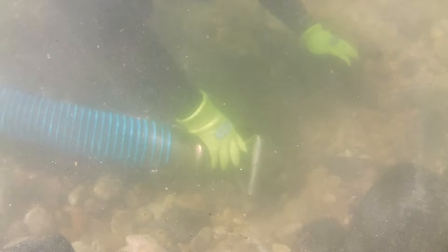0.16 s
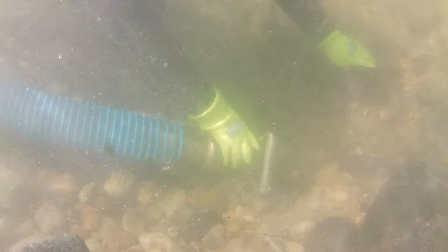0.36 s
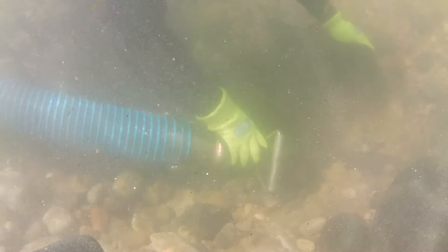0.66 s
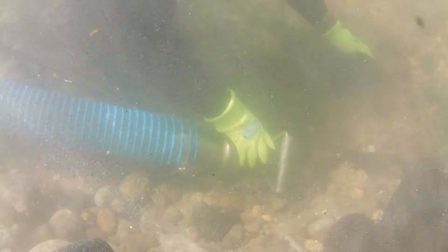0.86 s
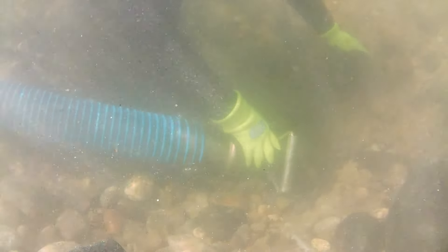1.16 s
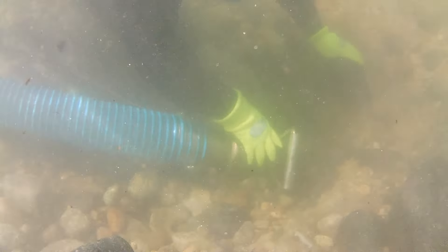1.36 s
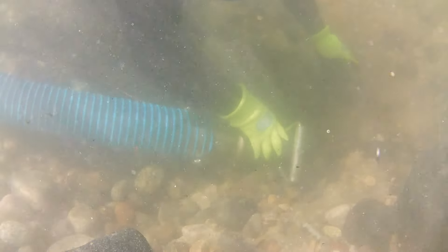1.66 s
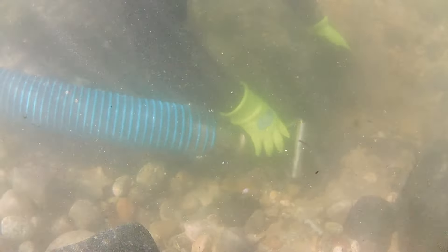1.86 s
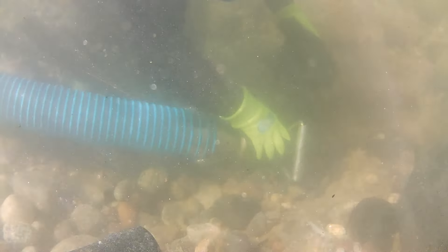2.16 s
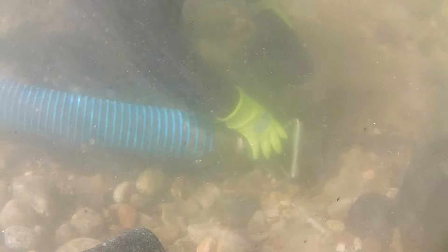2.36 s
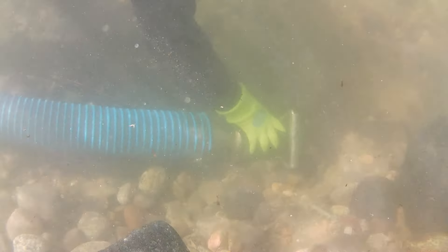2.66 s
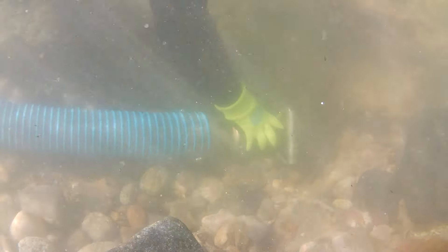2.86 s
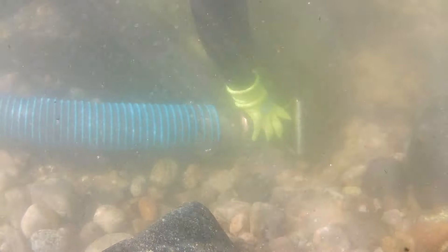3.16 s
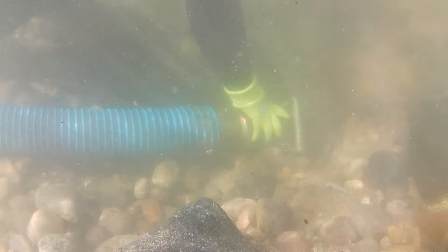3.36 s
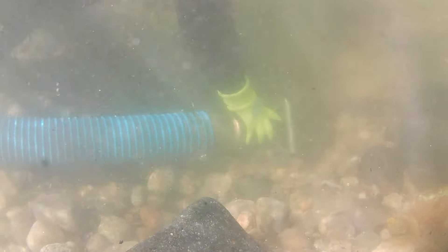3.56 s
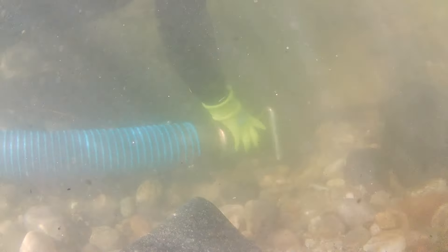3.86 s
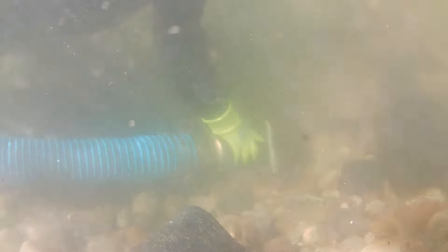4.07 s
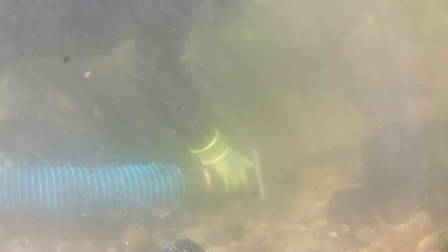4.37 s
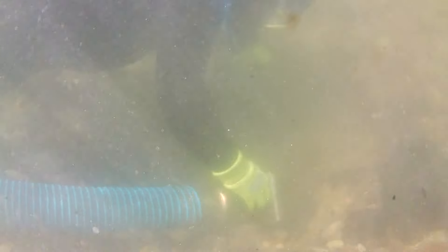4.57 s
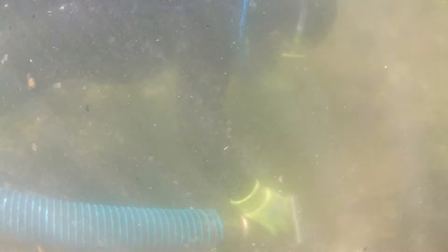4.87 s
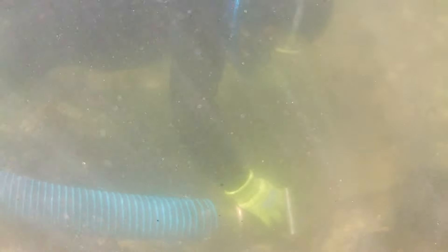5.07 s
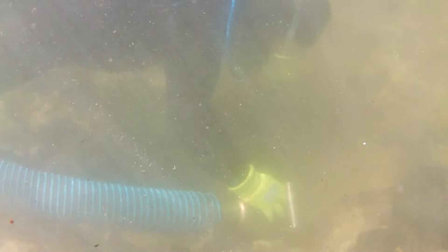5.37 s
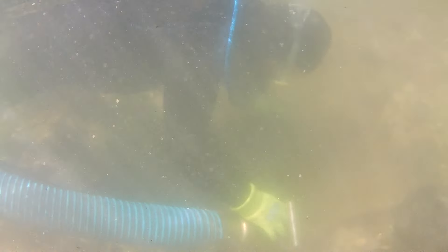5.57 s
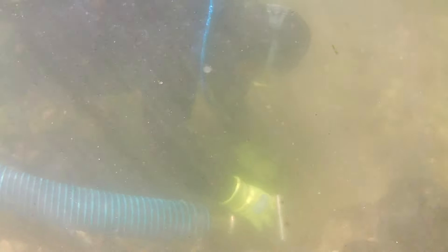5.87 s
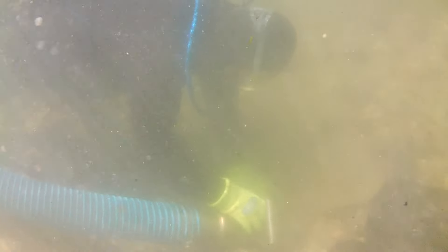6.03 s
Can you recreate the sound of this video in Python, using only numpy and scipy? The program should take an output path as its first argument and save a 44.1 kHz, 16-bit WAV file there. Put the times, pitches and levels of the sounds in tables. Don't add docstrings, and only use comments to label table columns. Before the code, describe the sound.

A quiet bed of murmuring water, faint motor hum and fine sandy hiss is broken by dry, short stone clacks, rattles and pebble ticks. The busiest, loudest cluster comes in the first second; knocks then scatter, with another hard metallic blow midway. Muffled low bumps follow as current rocks the enclosed underwater microphone, and a last sharp knock comes near the end.

```python
import sys
import numpy as np
from scipy import signal
from scipy.fft import rfft, irfft
from scipy.io import wavfile
from scipy.ndimage import uniform_filter1d

SR = 44100
rng = np.random.default_rng(int(sys.argv[2]) if len(sys.argv) > 2 else 0)


def level_to_linear(level):
    exponent = np.asarray(level, float) / 20
    return 10 ** exponent


def store_pcm(level_fs):
    pcm = np.round(np.clip(level_fs, -1, 1) * 32767).astype(np.int16)
    wavfile.write(sys.argv[1], SR, np.atleast_2d(pcm).T)


N = 273420
T = np.arange(N) / SR
CUT_HZ = 7650

PART_HZ = [900, 1700, 3500, 5600]
# time in seconds, low rush in dB, high grit in dB.
SAND = [(0.0, -50.5, -70), (0.15, -54.5, -77), (0.53, -53, -49.5), (1.14, -58.5, -82), (1.6, -55, -54),
        (2.0, -56.5, -76.5), (2.85, -56.5, -55), (3.25, -55, -72), (3.65, -56, -86.5), (4.3, -52, -79),
        (5.0, -55, -78), (5.4, -54, -87), (5.75, -53.5, -53), (6.2, -56, -69)]


def unit(x):
    return x / np.sqrt(np.mean(x ** 2))


def ring(x, hz, t60_s):
    r = np.exp(-np.log(1000) / (t60_s * SR))
    w = 2 * np.pi * hz / SR
    return signal.lfilter([0, r * np.sin(w)], [1, -2 * r * np.cos(w), r * r], x)


def walk(rate_hz):
    hold = int(SR / rate_hz)
    steps = np.repeat(rng.standard_normal(N // hold + 1), hold)
    return 1.3 * uniform_filter1d(uniform_filter1d(steps, hold), hold)[:N]


def curves(table):
    s, *columns = np.transpose(table)
    return [np.interp(T, s, c) for c in columns]


def lay(times_s, shapes):
    at = (np.asarray(times_s) * SR).astype(int)[:, None] + np.arange(shapes.shape[1])
    return np.bincount(np.clip(at, 0, N).ravel(), shapes.ravel(), N + 1)[:N]


def water():
    # frequency in Hz, density in dB per Hz.
    colour = np.array([(15, -31.5), (25, 9.5), (48, -2.5), (138, 2), (230, -11.5), (267, -7.5), (350, -8),
                       (479, -2), (583, -6), (775, -26.5), (900, -15.5), (1170, -75), (1980, -120)])
    # time in seconds, surge in dB, water in dB.
    swell = [
        (0.0, -57, -60),
        (3.85, -52.5, -59.5),
        (4.21, -47, -59),
        (6.2, -54, -61.5),
    ]
    surge_db, rest_db = curves(swell)
    low_db = surge_db - np.mean(surge_db) + np.mean(rest_db) + 8.1
    f = np.fft.rfftfreq(N, 1 / SR) + 1
    tilt_db = np.interp(np.log(f), np.log(colour[:, 0]), colour[:, 1])
    noise = rfft(rng.standard_normal(N)) * level_to_linear(tilt_db)
    noise = noise / np.std(irfft(noise * (f > 150) * (f < 650), N))
    out = 0
    for hz in 20 * 2 ** np.arange(0, 6, .5):
        band = irfft(noise * np.maximum(1 - abs(2 * np.log2(f / hz)), 0), N)
        flicker_db = 1.286 * walk(5.2)
        out = out + band * level_to_linear((rest_db if hz > 75 else low_db) + flicker_db)
    return out


def pump():
    # frequency in Hz, level in dB rms.
    lines = [(48, -69.5), (100, -68.5), (150, -69.5), (224, -72.5), (475, -76)]
    gain_db, waver_db = 5.5, 2.5
    turn_s = np.cumsum(1 + 0.0072 * walk(3.3)) / SR
    return sum(level_to_linear(db + gain_db + waver_db * walk(2.9)) * np.sin(2 * np.pi * hz * turn_s) for hz, db in lines)


def jet():
    mouth_hz, jet_db = [1700, 2320], -5
    mouth = signal.butter(3, mouth_hz, "band", fs=SR, output="sos")
    band = signal.sosfilt(mouth, rng.standard_normal(N))
    return unit(band) * level_to_linear(curves(SAND)[0] + jet_db + walk(13.0))


def sand_force():
    size = level_to_linear(3.8 * rng.exponential(size=N)) * rng.choice([-1, 1], N)
    grains_per_s = 350
    grains = unit(size * (rng.random(N) < grains_per_s / SR))
    return grains, rng.standard_normal(N)


def kind(rows, hz, rattle_s):
    return [(*row, hz, rattle_s) for row in rows]


def knocks():
    # time in seconds, hollow body, knock, clack and tick in dB.
    boulders = [(0.2331, -36, -30, -28, -77), (0.287, -23, -22.5, -37, -22), (0.303, -11.5, -13, -7, -7.5),
                (0.3185, -17.5, -23, -21, -46.5), (0.357, -52, -19.5, -38, -59),
                (0.4647, -22, -11.5, -22, -13.5), (0.8342, -45, -39.5, -37, -33),
                (0.9749, -25, -27.5, -38, -45), (0.9855, -47, -50, -35, -38.5),
                (1.309, -44.5, -12.5, -17.5, -37.5), (1.5418, -42, -39, -52, -39),
                (2.6081, -34, -29, -34, -25), (2.6303, -8.5, -5, -10.5, -20), (2.869, -47, -38, -38, -23.5),
                (3.0948, -39, -33, -34, -43), (3.6528, -38.5, -38, -32, -69.5),
                (3.6744, -39, -55, -68, -80), (4.229, -60.5, -57, -68, -78), (4.94, -50.5, -40, -49, -47),
                (5.2906, -49, -25, -40, -37), (5.686, -39, -25, -32, -39), (5.677, -55, -45, -38, -40),
                (5.695, -45, -30, -38, -30), (5.713, -41, -33, -40, -43), (5.7019, -31.5, -5.5, -22, -17.5)]
    cobbles = [
        (0.5763, -22, -6, -11.5, -23),
        (2.3142, -43, -19.5, -22, -21.5),
        (2.3829, -29.5, -11.5, -19, -20),
        (2.6723, -53.0, -21, -31, -34),
        (3.4227, -48, -32, -39, -35.5),
        (3.5163, -28, -13.5, -18.5, -21.5),
        (4.0002, -44, -30, -45, -75),
        (4.511, -44, -29.5, -35.5, -83),
        (5.8154, -47, -26, -28, -33.5),
    ]
    taps = [(0.173, -62, -56, -37.5, -63), (0.393, -54, -26, -34, -67), (0.755, -64, -35.5, -38, -57),
            (1.0357, -49, -29.5, -42, -57), (1.3571, -52, -30, -35.5, -37.5),
            (1.5811, -35.5, -23.5, -71, -36), (1.9854, -90, -38.5, -34, -63),
            (2.276, -33.5, -16.5, -27, -22), (2.4025, -57, -32, -46, -38), (3.0752, -87, -23, -32.5, -58),
            (3.8486, -64, -32, -37, -83), (3.9315, -38.5, -5, -12.5, -27.5), (3.9597, -33, -13, -22.5, -46),
            (4.0178, -52, -24.5, -31.5, -84), (4.0598, -45, -32, -53, -73), (4.3034, -64.5, -36, -48, -76),
            (4.5489, -52, -24.5, -23, -52), (4.577, -65.5, -37, -37, -67), (4.5907, -62, -25.5, -25.5, -50),
            (4.6197, -52.0, -42, -35, -52), (4.677, -60, -46, -41, -71), (5.0276, -58, -33.5, -41, -42),
            (5.2693, -49, -25, -45, -30.5), (5.571, -58, -38.0, -74, -83), (5.737, -59, -33, -41, -33.5),
            (6.1124, -50, -15.5, -22, -23)]
    pebbles = [(0.2148, -31, -29.5, -26, -40), (0.43, -28, -20.5, -20, -23), (0.4487, -49.0, -35, -36, -46),
               (0.563, -33, -27, -25.5, -30), (0.8892, -48, -27, -32.5, -46),
               (0.9253, -57, -33, -41, -44.5), (1.3364, -68, -68, -47, -53), (1.44, -49, -42, -49, -47),
               (1.5698, -35.5, -22, -21, -29.5), (2.153, -36, -21.5, -32.5, -21),
               (2.54, -55, -38, -45, -51), (2.7201, -52, -34, -42, -30), (2.7956, -37, -59, -41.5, -47.5),
               (2.8114, -32, -26.5, -26, -42), (2.8328, -61, -50, -45, -42), (5.5457, -65, -42, -42, -53),
               (5.6107, -67, -36, -58, -27), (5.9137, -47, -41, -40, -35.5)]
    shingle = [(0.534, -56, -35, -46, -31.5), (1.7859, -35, -52, -51, -30), (2.686, -49, -17, -34, -26),
               (2.7001, -44, -18.5, -17.5, -22.5), (2.8898, -40, -34.0, -24, -34),
               (2.8997, -41, -24.5, -24.5, -31.5), (3.0299, -44, -35, -35.5, -36),
               (3.1176, -35, -14.5, -22, -24), (4.0998, -50, -32, -33, -38), (4.7052, -60, -38, -43, -36.5),
               (5.1206, -59, -33, -35.5, -35), (5.311, -46, -36, -41, -40), (5.325, -52, -34, -33, -61),
               (5.4215, -51, -28.5, -42, -33), (5.803, -48, -28, -30, -35), (5.843, -59, -50, -53, -39),
               (5.9603, -62, -32, -38, -32), (6.0372, -51, -30, -38, -29), (6.1241, -44, -24, -33, -38)]
    gravel = [(0.416, -49, -49.5, -57, -32), (0.4825, -19, -34, -10.5, -19),
              (0.6582, -49.0, -36, -32, -38.5), (0.698, -38.5, -30.5, -32, -38),
              (0.7813, -40, -41, -34.0, -33), (1.1577, -77.5, -63, -68, -54),
              (1.2594, -58, -39, -51, -47.0), (1.5033, -26.5, -16, -16, -21.5),
              (1.603, -63.0, -45, -44, -37), (1.7562, -42, -35.5, -48, -28), (1.8556, -50, -25.5, -16, -27),
              (2.104, -40, -34, -39, -31.5), (2.325, -36, -21, -24, -31), (2.4426, -54, -40, -48, -39.5),
              (2.4935, -35.5, -49, -53, -28), (2.661, -32, -21, -24, -23), (2.7319, -45, -32, -42, -38),
              (2.9183, -42, -32, -61, -39), (3.365, -41, -20.5, -33, -24.5), (3.8142, -56.5, -32, -38, -40),
              (5.255, -57, -35, -40, -41), (5.4047, -54, -35, -31, -35), (5.47, -39.5, -25.5, -41, -32),
              (5.7768, -61, -25, -24, -29.5), (5.8895, -55.0, -37, -55, -36), (6.164, -56, -39, -48, -38.5)]
    # time in seconds, treble in dB.
    chips = [(.63, -42), (.849, -37.5), (.867, -39), (.952, -42), (1.02, -45.5), (1.458, -47), (1.928, -48),
             (2.229, -46), (2.594, -47), (2.764, -38), (2.852, -46), (2.957, -42), (2.966, -39.5),
             (3.353, -69), (3.408, -56), (4.27, -46), (4.335, -56), (4.751, -47.5), (4.886, -47.5),
             (5.102, -49), (5.627, -40), (5.652, -44), (5.769, -49)]
    # time in seconds, level in dB.
    specks = [(0.0054, -46), (0.035, -54), (0.0947, -57), (1.077, -53.5), (1.1204, -63), (1.2044, -70),
              (1.2394, -49), (1.3902, -49), (1.4205, -44), (1.725, -44.5), (1.9704, -62), (2.0173, -47),
              (2.0517, -70), (2.2134, -54), (2.581, -42), (2.9886, -41), (3.167, -36.5), (3.2211, -40),
              (3.285, -43), (3.4714, -49), (3.8836, -51), (4.2143, -55), (4.8264, -55), (4.9147, -53),
              (5.0669, -43), (5.2421, -47), (5.3607, -53), (5.5248, -64), (5.5792, -66)]
    # favoured frequency in Hz, rattle in seconds.
    traits = [
        (1000, 0.0017),
        (1480, 0.0014),
        (1990, 0.0019),
        (3165, 0.0024),
        (4030, 0.0021),
        (4950, 0.0012),
        (5200, 0.0017),
    ]
    speck_db = -8
    body_db, knock_db, clack_db, tick_db = -9, -3.5, -3.5, -4.5
    grit = list(chips) + [(s, db + speck_db) for s, db in specks]
    grit = [(s, db + body_db, db + knock_db, db + clack_db, db + tick_db) for s, db in grit]
    tables = boulders, cobbles, taps, pebbles, shingle, gravel, grit
    return np.array(sum((kind(rows, *trait) for rows, trait in zip(tables, traits)), []))


def blend(part_db, hz):
    parts = np.arange(len(PART_HZ))
    place = np.interp(np.log(hz), np.log(PART_HZ), parts)
    return part_db @ np.maximum(1 - abs(place - parts), 0)


def contacts(rattle_s):
    rise_s, drag_db, drag_s = 0.00005, -27, 0.0092
    u = np.arange(1400) / SR
    noise = rng.standard_normal((len(rattle_s), len(u)))
    length_s = np.maximum(rattle_s, 2e-4)[:, None]
    rattle = (1 - np.exp(-u / rise_s)) * np.exp(-u / length_s) * noise
    drag = level_to_linear(drag_db) * np.exp(-u / drag_s) * noise[:, ::-1]
    return rattle, drag, u


def shell():
    shell_modes = list([(547, -17, 0.086), (746, -9, 0.02), (940, -12.5, 0.013), (1072, -5.5, 0.046),
                        (1322, -17, 0.13), (1413, -5.5, 0.028), (1570, -6, 0.019), (1540, -2, 0.024),
                        (1825, -6, 0.039), (2041, -5, 0.031), (2096, -8.5, 0.016), (2214, -21.5, 0.064),
                        (2620, -17, 0.11), (3131, -1, 0.026), (3246, 0, 0.011), (3300, -14.5, 0.0063),
                        (4033, -1, 0.016), (3984, 2, 0.014), (4163, -5, 0.058), (4866, 1.5, 0.0065),
                        (4973, 2, 0.054), (5275, -2, 0.045), (5627, -6, 0.082), (6140, -7, 0.017),
                        (6368, -11.5, 0.052), (6680, -25.5, 0.073), (6430, -10, 0.0038), (6910, -7, .05),
                        (7400, -13.5, 0.12), (7490, -18, 0.096)])
    cover_modes = list([(8400, -25, 0.0072), (9880, -19.5, 0.05), (8900, -9.5, 0.099), (10720, -26, 0.018),
                        (10920, -23, .03), (11660, -28.5, 0.09), (12100, -36, .03), (15200, -41, .03)])
    part_db = (3.0, -3, -4, -5)
    favour_db, favour_octaves, luck_db = 7, 0.074, 2
    rush_db, grit_db, cover_grit_db = -31, -31, -8
    cover_db, grow_db_per_s, cover_slope = -16, 1.8, 0.79
    ring_cycles, brisk = 150, 0.29

    hits = knocks()
    over_db = np.maximum(hits[:, 1:5].max(1) + 30, 0)
    rattle, drag, u = contacts(hits[:, 6] * level_to_linear(-brisk * over_db))
    chance = rng.standard_normal((len(hits), len(shell_modes) + len(cover_modes)))
    grains, flow = sand_force()
    rush, grit = curves(SAND)
    gust_db = 2.5 * walk(5)
    low = level_to_linear(rush + rush_db + gust_db) * (0.3 * grains + flow)
    high = level_to_linear(grit + grit_db) * (0.9 * grains + 0.15 * level_to_linear(walk(8.6)) * flow)
    body, cover = 0, 0
    for k, (hz, db, t60_s) in enumerate(shell_modes + cover_modes):
        on_mode = abs(rattle[:, :400] @ np.exp(-2j * np.pi * hz * u[:400]))[:, None] + 1
        favour = favour_db * np.exp(-(np.log2(hz / hits[:, 5]) / favour_octaves) ** 2)
        blow_db = blend(hits[:, 1:5] + part_db, hz) + favour
        sand = low if hz < 2600 else high
        if hz > CUT_HZ:
            blow_db = cover_db + grow_db_per_s * hits[:, 0] + cover_slope * blow_db
            sand = level_to_linear(cover_grit_db) * high
        blow = level_to_linear(blow_db + luck_db * chance[:, k])[:, None]
        push = lay(hits[:, 0], blow * (rattle / on_mode + drag / 5)) + sand
        sound = (-1) ** k * level_to_linear(db) * ring(push, hz, min(t60_s, ring_cycles / hz))
        if hz < CUT_HZ:
            body = body + sound
        else:
            cover = cover + sound
    body = signal.sosfilt(signal.ellip(6, .5, 50, CUT_HZ, fs=SR, output="sos"), body)
    cover = signal.sosfilt(signal.butter(8, 8250, "high", fs=SR, output="sos"), cover)
    return signal.sosfilt(signal.butter(4, 520, "high", fs=SR, output="sos"), body) + cover


def silt():
    # frequency in Hz, level in dB, T60 in seconds.
    port_modes = [(3276, -1, 0.0048), (4120, -7, 0.0052), (5030, 0, 0.0027), (5940, -10.5, 0.008),
                  (7280, -2, 0.0019)]
    silt_db, drift_db, grains_per_s, smear_s = -12, -73, 900, 0.0024
    stir_db, stir_slope, settle_s = -26, 0.68, 0.011
    whine_hz, whine_db = 14900, -105
    hits = knocks()
    u = np.arange(6000) / SR
    stir = level_to_linear(stir_db + stir_slope * hits[:, 4])[:, None]
    cloud = lay(hits[:, 0], stir * np.exp(-u / settle_s))
    grains = level_to_linear(2.6 * rng.exponential(size=N)) * (rng.random(N) < grains_per_s / SR)
    patter = signal.fftconvolve(grains, np.exp(-u[:800] / smear_s))[:N] * rng.standard_normal(N)
    band = sum((-1) ** k * level_to_linear(db) * ring(patter, hz, t60_s) for k, (hz, db, t60_s) in enumerate(port_modes))
    band = signal.sosfilt(signal.butter(4, [2800, 7500], "band", fs=SR, output="sos"), band)
    density = cloud + level_to_linear(curves(SAND)[1] + silt_db) + level_to_linear(drift_db)
    whine = level_to_linear(3.9 * walk(6.5)) * ring(rng.standard_normal(N), whine_hz, .03)
    return unit(band) * density * level_to_linear(3.2 * walk(11)) + level_to_linear(whine_db) * unit(whine)


def deaf(x):
    for hz, sharp in [(2720, 14), (6180, 40)]:
        x = signal.lfilter(*signal.iirnotch(hz, sharp, SR), x)
    return x


def stones():
    own_db, spread_db, spread_octaves = -11, 0.59, 0.486
    t60_s, rise_s = 0.033, 0.0011
    hits = knocks()
    u = np.arange(1400) / SR
    chance = rng.standard_normal((len(hits), 4, 2))
    hz = np.clip(hits[:, 5:6] * 2 ** (spread_octaves * chance[..., 0]), 700, 7200)
    db = np.array([np.interp(np.log(own), np.log(PART_HZ), row[1:5]) for own, row in zip(hz, hits)])
    size = level_to_linear(db + own_db + spread_db * chance[..., 1])
    modes = np.einsum("em,emu->eu", size, np.sin(2 * np.pi * hz[..., None] * u))
    fade = (1 - np.exp(-u / rise_s)) ** 2 * np.exp(-np.log(1000) * u / t60_s)
    rung = lay(hits[:, 0], modes * fade)
    rung = signal.lfilter(*signal.iirnotch(2700, 4, SR), rung)
    return signal.sosfilt(signal.butter(4, 600, "high", fs=SR, output="sos"), rung)


def partials(table, t60_s, rise_s):
    s, hz, db = np.transpose(table)[:, :, None]
    u = np.arange(9000) / SR
    t60_s = np.minimum(t60_s, 400 / hz)
    fade = (1 - np.exp(-u / rise_s)) ** 2 * np.exp(-np.log(1000) * u / t60_s)
    return lay(s[:, 0], level_to_linear(db) * np.sin(2 * np.pi * hz * u) * fade)


def stone_notes():
    # time in seconds, frequency in Hz, level in dB.
    struck = [(0.2156, 1880, -24.5), (0.2874, 775, -24), (0.2876, 3100, -34), (0.2876, 5860, -27.5),
              (0.302, 1093, -12.5), (0.3029, 5710, -18), (0.303, 1393, -6), (0.303, 3210, -8),
              (0.303, 4770, -13), (0.3031, 3690, -13), (0.3195, 6560, -30), (0.357, 2130, -27.5),
              (0.4295, 820, -26), (0.4296, 2565, -31), (0.4354, 4440, -27), (0.4648, 5840, -27),
              (0.4655, 780, -23), (0.4655, 6200, -28), (0.4821, 800, -26), (0.4831, 3680, -30),
              (0.4836, 1380, -23), (0.4849, 6120, -28), (0.5761, 1420, -10), (0.5767, 4480, -19.5),
              (0.5794, 5680, -27), (1.3085, 1092, -21), (1.3088, 1820, -21), (1.5036, 1460, -20),
              (1.5041, 4060, -26.5), (1.5073, 5400, -22.5), (1.5074, 5060, -35), (1.8554, 1400, -24.5),
              (1.8604, 4370, -30), (2.1033, 5400, -41), (2.1539, 6360, -32), (2.2766, 5500, -28),
              (2.3141, 1470, -16), (2.3144, 3700, -27), (2.3281, 5400, -29), (2.3814, 670, -31.5),
              (2.3832, 3790, -22.5), (2.4036, 1825, -29), (2.4042, 5060, -31), (2.6305, 4800, -20),
              (2.6306, 3900, -19.5), (2.6617, 5000, -37), (2.6997, 5250, -23), (2.9005, 5270, -30),
              (3.5161, 2810, -32), (3.5166, 1600, -20), (4.0185, 1810, -26), (4.5518, 2300, -25),
              (5.7018, 990, -26), (5.7021, 7300, -29.5), (5.7024, 2080, -19.5), (5.703, 2380, -20),
              (5.8176, 2470, -28.5), (6.0392, 7270, -32), (6.1133, 2000, -19.5), (6.1144, 7240, -29)]
    return partials(struck, t60_s=0.029, rise_s=0.00045)


def nozzle():
    # frequency in Hz, level in dB, T60 in seconds.
    tube_modes = [(920, -3.5, 0.24), (1127, 2, 0.12), (1314, -4, 0.29), (1535, -3, 0.24), (1950, -9, 0.18)]
    # time in seconds, level in dB.
    strikes = [(0.303, -27.5), (0.32, -65.5), (0.464, -59), (0.482, -37), (0.574, -49), (0.974, -58),
               (1.311, -67), (2.313, -45), (2.384, -46), (2.631, -29), (3.514, -44), (5.705, -41)]
    s, db = np.transpose(strikes)
    mix_db = 0.5 * rng.standard_normal((len(s), len(tube_modes)))
    out = 0
    for k, (hz, mode_db, t60_s) in enumerate(tube_modes):
        push = lay(s, level_to_linear(db + mode_db + mix_db[:, k])[:, None])
        out = out + (-1) ** k * ring(push, hz, t60_s)
    return out


def nozzle_notes():
    # time in seconds, frequency in Hz, level in dB.
    single = [(0.484, 1320, -43), (0.576, 1536, -33), (0.976, 1036, -42), (1.504, 1960, -35),
              (1.504, 1115, -46), (1.856, 1090, -49), (2.277, 1550, -37), (2.326, 1116, -43),
              (2.326, 1930, -47), (2.631, 1960, -26.5), (2.631, 1095, -31), (2.7, 1350, -49),
              (3.118, 1130, -43), (3.118, 1310, -42), (3.365, 4935, -25.5), (3.365, 1098, -45.5),
              (3.517, 1523, -42.5), (3.517, 1105, -40.5), (5.704, 1981, -29), (5.704, 1006, -41),
              (5.704, 1544, -43)]
    return partials(single, t60_s=0.16, rise_s=.001)


def bumps():
    # time in seconds, peak in dB, rocking in Hz, click in dB against the peak.
    thumps = [(1.542, -38, 87, -20), (1.614, -40, 84, -4), (3.671, -37.5, 104.3, 1), (3.705, -48.5, 142, 8),
              (3.732, -31.5, 98, -10.5), (4.11, -24.5, 102, -10.5), (4.221, -35.5, 138, -1.5),
              (4.246, -30, 83.5, -16), (4.477, -25.5, 95, -18.5), (4.54, -27.5, 77.4, -19),
              (4.608, -29, 94, -36), (4.649, -27.5, 92, -8), (4.677, -33, 69, -33), (4.807, -38.5, 101, -4),
              (4.835, -36.5, 99, -30), (5.113, -33.5, 118, -9.5), (5.423, -44, 102, 0),
              (5.937, -25.5, 97.7, -11.5)]
    rise_s, fall_s, lag_s, shove = 0.0021, 0.013, 0.00325, 0.57
    rub_s, rub_db = 0.0057, 2.0
    sag, sag_s = 0.13, 0.026
    s, db, hz, click_db = np.transpose(thumps)[:, :, None]
    u = np.arange(4000) / SR
    swing_s = (1.1 - sag) * u + sag * sag_s * (1 - np.exp(-u / sag_s))
    envelope = 1.47 * (1 - np.exp(-u / rise_s)) ** 2 * np.exp(-u / fall_s)
    rock = envelope * (np.sin(2 * np.pi * hz * swing_s) - shove)
    dull = signal.butter(3, [170, 620], "band", fs=SR, output="sos")
    rub = unit(signal.sosfilt(dull, rng.standard_normal((len(s), len(u)))))
    rub = rub * u / rub_s * np.exp(-u / rub_s)
    return lay(s[:, 0] + lag_s, level_to_linear(db) * (rock + level_to_linear(click_db + rub_db) * rub))


def scene():
    hiss = level_to_linear(-91) * rng.standard_normal(N)
    flow = water() + pump() + jet()
    housing = deaf(shell() + silt() + hiss)
    struck = stones() + stone_notes() + nozzle() + nozzle_notes()
    return (flow + housing + struck + bumps())[None]


def spectral_blocks(x):
    block = 2560
    smear_db, coarse_db, drop_db = -15, 8.0, -103
    spill_db, spill_hz, spill_slope = -49.5, 14000, .8
    f, _, z = signal.stft(x, SR, nperseg=block)
    local = np.sqrt(uniform_filter1d(abs(z) ** 2, 8, axis=0))
    whole = np.sqrt(np.mean(abs(z[f > 600]) ** 2, axis=0))
    noise = rng.standard_normal(z.shape) + 1j * rng.standard_normal(z.shape)
    smear = level_to_linear(smear_db) * local * (f > 600)[:, None]
    loudness = whole.max() * (whole / whole.max()) ** spill_slope
    spill = level_to_linear(spill_db) * loudness * ((f > 600) / (1 + (f / spill_hz) ** 2))[:, None]
    z = z + noise * (smear + spill)
    z = z * np.where(abs(f - 8020) < 330, level_to_linear(-14), 1)[:, None]
    step = level_to_linear(coarse_db) * local + 1e-12
    sparse = (np.round(z.real / step) + 1j * np.round(z.imag / step)) * step
    z = z * ((local > level_to_linear(drop_db)) | (f < 2500)[:, None])
    z = np.where((f > CUT_HZ)[:, None], sparse, z)
    return signal.istft(z, SR, nperseg=block)[1][:N]


def band_limit(x):
    return signal.sosfilt(signal.butter(12, 15900, fs=SR, output="sos"), x)


def record(dry):
    ceiling = .95
    bass_cut = signal.butter(2, 28, "high", fs=SR, output="sos")
    rounded = ceiling * np.tanh(signal.sosfilt(bass_cut, dry[0]) / ceiling)
    mix = spectral_blocks(rounded)[None]
    return band_limit(mix)


dry = scene()
out = record(dry)
store_pcm(out)
```